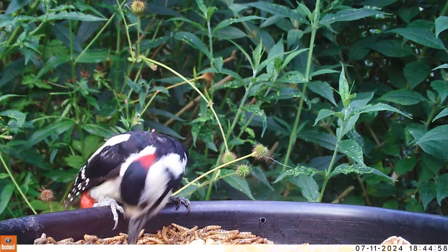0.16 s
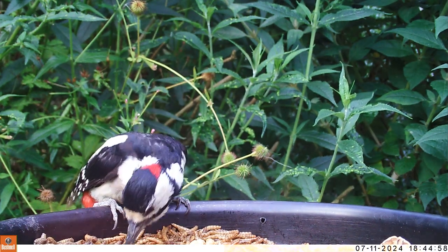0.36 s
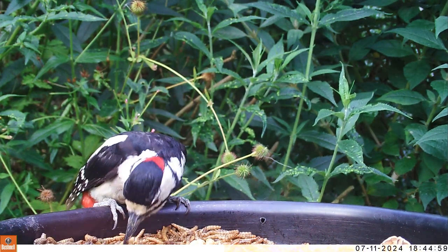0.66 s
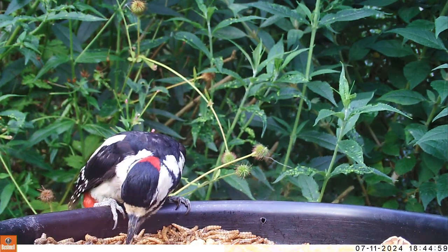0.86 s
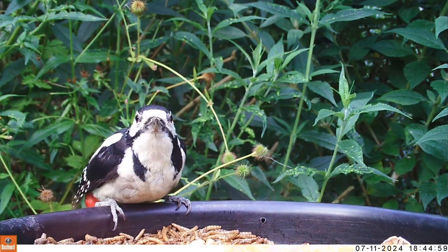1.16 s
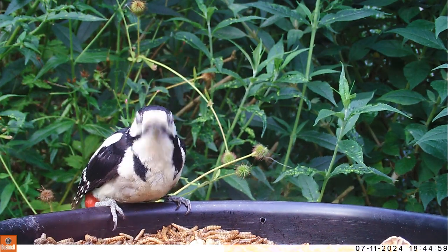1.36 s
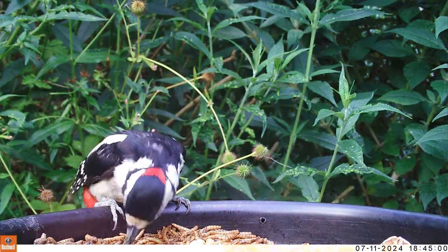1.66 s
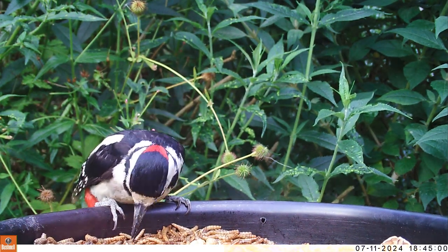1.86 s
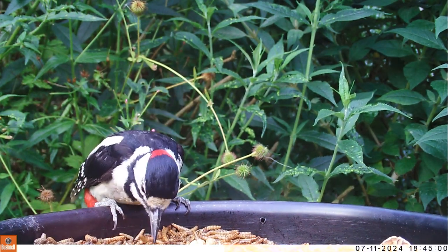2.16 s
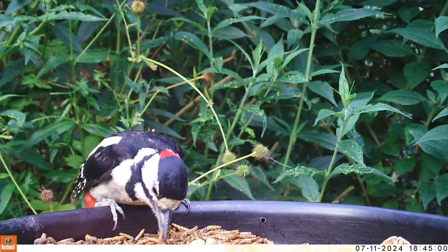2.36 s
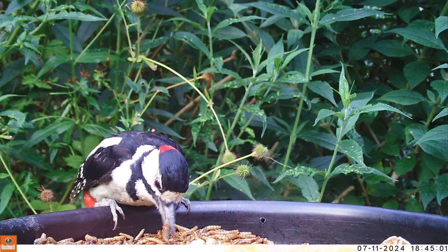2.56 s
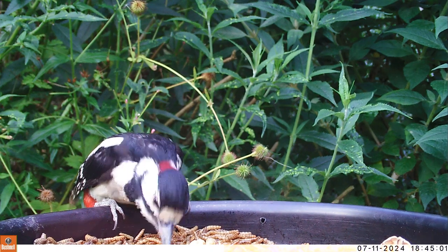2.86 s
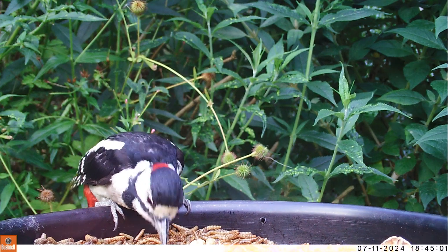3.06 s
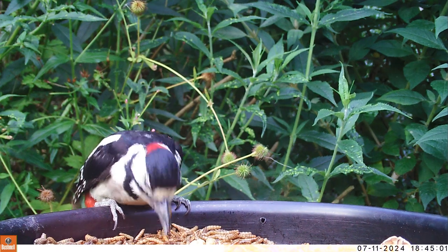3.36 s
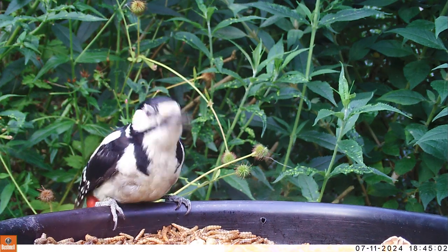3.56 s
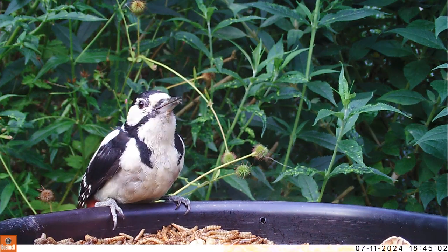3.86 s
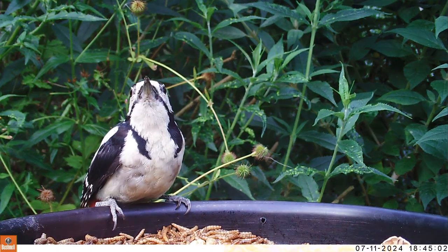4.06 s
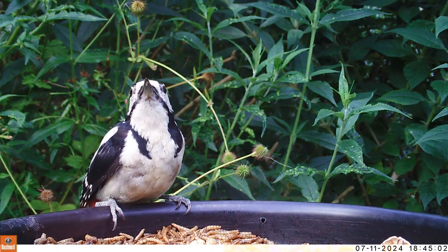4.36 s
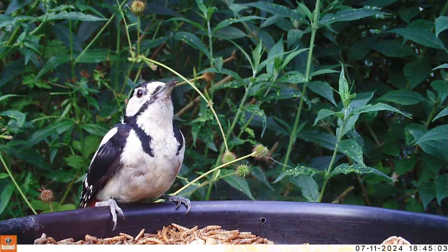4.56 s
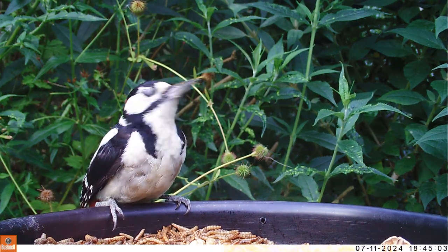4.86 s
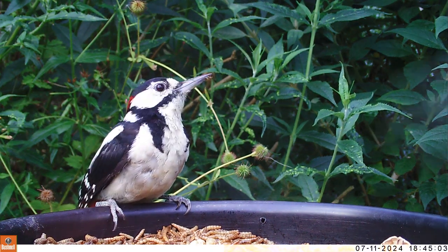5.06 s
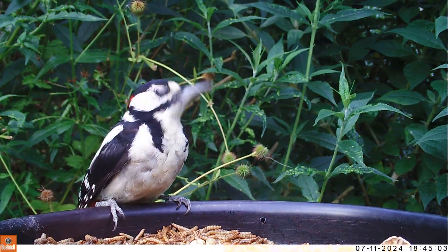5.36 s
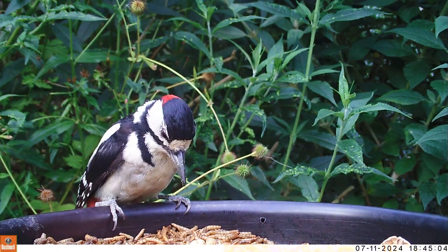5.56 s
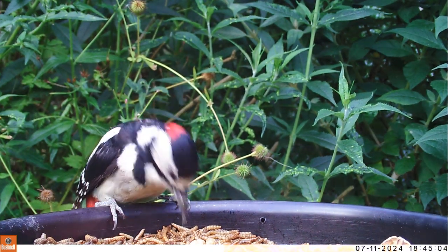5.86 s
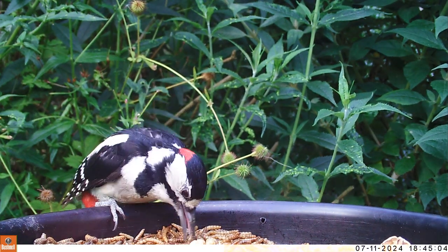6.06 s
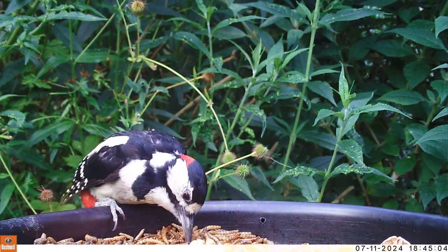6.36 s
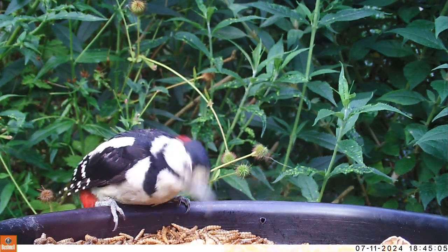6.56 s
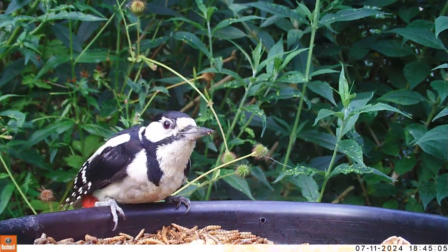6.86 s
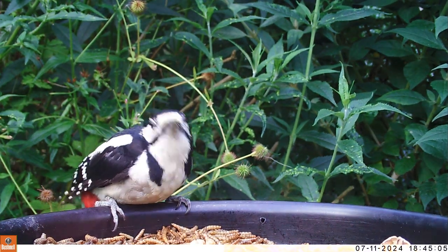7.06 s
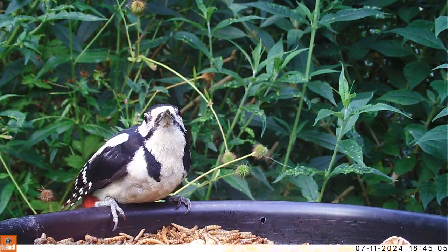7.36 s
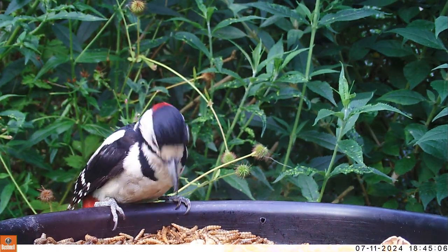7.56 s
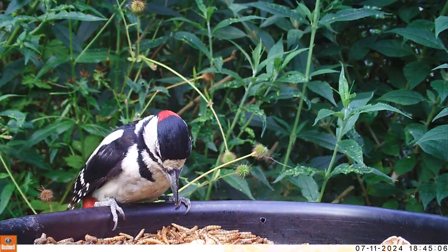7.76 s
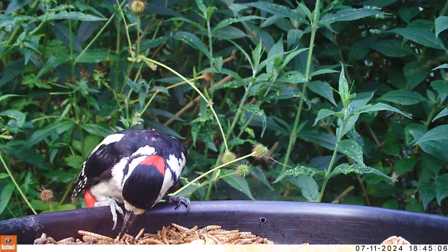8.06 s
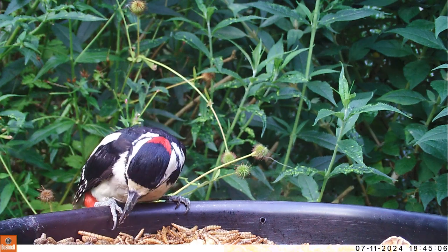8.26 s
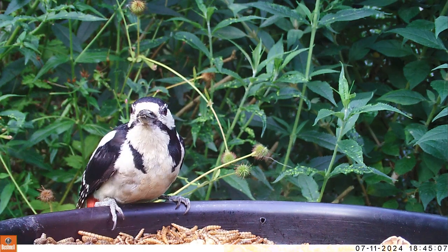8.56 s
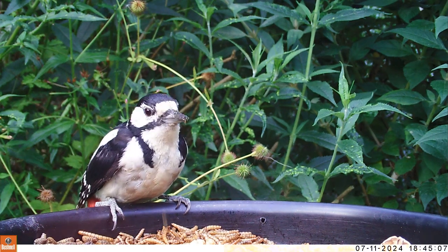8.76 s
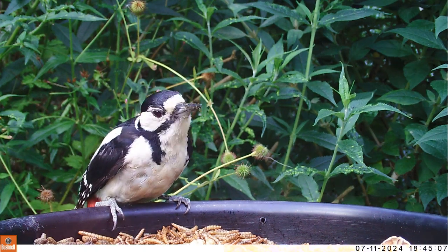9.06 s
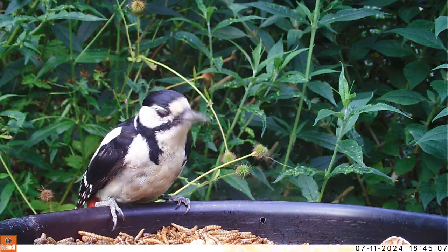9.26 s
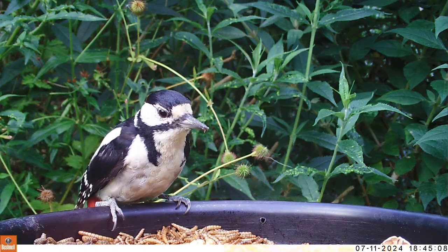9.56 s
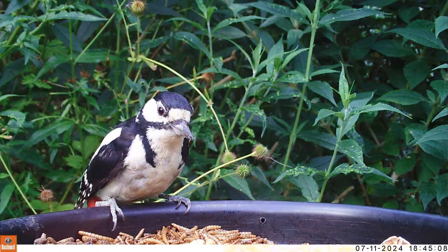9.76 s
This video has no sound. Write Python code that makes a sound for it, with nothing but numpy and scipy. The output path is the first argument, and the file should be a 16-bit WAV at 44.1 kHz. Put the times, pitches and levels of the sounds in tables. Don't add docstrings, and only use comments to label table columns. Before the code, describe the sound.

Very close to a small microphone in a garden, a woodpecker scrapes and pecks at dry food in a plastic tray. Low thumps jolt the stand, wings puff softly, then scattered taps follow. A dense burst of cracks and knocks comes midway, then sparser pecks. Towards the end a distant songbird whistles and trills, blurred by tree echoes, over steady wind rumble and hiss.

```python
import sys
import numpy as np
from scipy import signal
from scipy.io import wavfile
from scipy.ndimage import uniform_filter1d

SR = 44100
rng = np.random.default_rng(int(sys.argv[2]) if len(sys.argv) > 2 else 0)


def boost_factor(decibels):
    exponent = np.asarray(decibels, float) / 20
    return 10 ** exponent


def store_wav(level_fs):
    pcm = np.round(np.clip(np.atleast_2d(level_fs), -1, 1) * 32767)
    wavfile.write(sys.argv[1], SR, pcm.T.astype(np.int16))


N = 437031


def evened(x):
    return x / np.sqrt(np.mean(x ** 2) + 1e-20)


def add(mix, start_s, sound):
    part = mix[max(round(start_s * SR), 0):][:len(sound)]
    part += sound[:len(part)]


def ring(x, modes, soft=False):
    t = np.arange(1200) / SR
    response = 0
    for k, (hz, width, db) in enumerate(modes):
        decay = np.exp(-np.pi * width * t)
        if soft:
            decay = decay * t * np.exp(-0.55 * np.pi * width * t)
        sign = (-1) ** k
        response = response + sign * boost_factor(db) * np.sqrt(width) * decay * np.sin(2 * np.pi * hz * t)
    response = response / np.linalg.norm(response)
    response = np.reshape(response, (1,) * (x.ndim - 1) + (-1,))
    return signal.oaconvolve(x, response, axes=-1)[..., :x.shape[-1]]


# centre_s, level_db, spread_ms, tray_share_db
PECKS = [(0.2849, -57.5, 1.8, -18), (0.3203, -47, 0.86, -27), (0.3273, -63, 3.7, -17),
         (0.3567, -57, 1.3, -30), (0.389, -55, 1.8, -25), (1.763, -45, 0.85, -24),
         (2.0813, -61.5, 2.1, -19), (2.1077, -57.5, 1.4, -24), (2.7752, -68.5, 2.5, -9),
         (2.9533, -57.5, 2.9, -10), (3.2925, -63.5, 2.2, -13), (4.8425, -54, 1.5, -22),
         (5.1308, -50, 0.43, -19), (5.2995, -56, 3.6, -18), (5.311, -64, 2.5, -15), (5.3439, -49, 1.3, -13),
         (5.3548, -56, 2.9, -4), (5.3688, -52, 1.4, -13), (5.3942, -45, 1.2, -6.5),
         (5.5479, -41.5, 1.7, -21), (6.021, -59, 11, -17), (6.3845, -56, 4.7, -20),
         (6.3965, -51.5, 1.6, -16), (6.5725, -54, 0.97, -7), (6.4384, -59, 1.9, -25),
         (6.5436, -60, 0.82, -21), (8.0352, -55, 1.7, -24), (8.0407, -57, 3.4, -10),
         (8.0477, -43, 0.85, -20), (8.0542, -61, 4.5, -23), (8.7207, -65, 2.6, -25), (2.923, -70, 1, -6),
         (3.0565, -66, 1, -12), (3.067, -68, 1.2, -12), (3.077, -69, 1.5, -10), (3.1765, -71, 2, -18),
         (3.193, -72, 1, -15), (3.268, -70, 2.5, -20), (6.415, -64, 2, -22), (6.4315, -66, 1.2, -20),
         (0.487, -57, 1.7, -6), (0.545, -62, 2, -18)]
# centre_s, level_db, spread_ms, tray_share_db
KNOCKS = [(0.414, -52, 9.8, -5.5), (0.432, -62.5, 6.8, 1), (0.8211, -66, 2.3, -13), (1.7515, -57, 1.3, -12),
          (2.2235, -64, 1.4, -4), (2.208, -59, 0.83, -1), (2.25, -70, 2.2, -11), (2.5173, -65, 1.5, -5),
          (2.669, -70, 1.5, -8), (3.1099, -56, 3.8, -10), (5.2295, -59, 2.8, 6), (5.3633, -56, 2.9, -7),
          (5.3778, -62, 2, -4), (5.5449, -64, 1.9, 15), (5.562, -50, 0.83, -15), (5.8522, -65, 1.8, -3),
          (6.0483, -65, 3.3, -8), (6.0687, -58.5, 2, -6), (6.2393, -71, 1.5, -4), (6.4543, -68, 2.3, -13),
          (6.6405, -54.5, 3.7, 0), (6.6509, -64, 2.1, 9)]
# centre_s, level_db, spread_ms, tray_share_db
CRACKS = [(0.3203, -52, 0.61, -23), (0.504, -58, 1.4, 0), (0.5103, -58.5, 4.6, -6), (2.8, -70, 1.2, -13),
          (3.313, -68, 1.5, -16), (5.2185, -60, 1.8, -9), (5.2243, -45.5, 2.6, -27), (5.2456, -58, 7.4, -4),
          (5.262, -51, 3, -5), (5.2665, -45.5, 2.4, -10.5), (5.2735, -51.5, 3.7, -3),
          (5.3298, -50.5, 1.9, -11), (5.3478, -45, 2.5, -17), (5.3733, -50, 1.1, -15), (5.3955, -52, 2, -6),
          (5.4032, -49.5, 1.7, -8), (5.4795, -61.5, 2.8, -11), (5.582, -56.5, 2.7, -9),
          (5.5938, -56.5, 1.2, -5), (5.6302, -58.5, 0.77, -20), (5.8268, -65.5, 1.7, 5),
          (5.8751, -63.5, 1.4, -9), (6.6385, -48.5, 3, -8), (9.0564, -66.5, 1.5, -14),
          (9.687, -74, 2.5, -1), (9.7264, -73, 1.7, 6), (5.3675, -43.5, 1.2, -14), (5.486, -59, 1.7, -2),
          (3.1335, -70, 1, -14), (5.2405, -63, 3, -8)]
# centre_s, level_db, spread_ms, tray_share_db
SCRAPES = [(0.0738, -69.5, 4.7, -1), (0.1756, -69.5, 7, -7), (0.2145, -67.5, 18, -3), (0.2759, -73, 21, 2),
           (0.3347, -76, 18, -3), (0.3746, -68, 9, -6), (0.392, -51.5, 7.7, -7), (0.403, -44.5, 7, -18),
           (0.4575, -58.5, 5.8, -2), (0.474, -65, 3.5, -3), (0.5468, -68, 19, -19), (0.6031, -70.5, 16, -7),
           (1.764, -66, 9, -5), (2.2259, -77, 13, -5), (3.016, -74, 9, -8), (3.1284, -70, 6.9, -14),
           (5.3219, -62.5, 21, -3), (5.512, -65, 15, -7), (5.564, -56.5, 5.6, -1), (5.8342, -75, 9.8, 0),
           (5.9664, -73, 21, -6), (6.0812, -70, 6, -15), (6.4049, -70, 19, -10), (6.589, -61, 5.6, -6),
           (6.607, -63, 4.7, -10)]
# pitch_hz, width_hz, level_db
RIM = [(5800, 3100, -5.5), (7300, 920, -2), (9500, 990, -3.5), (11040, 770, 3.5), (11060, 1240, 7.5),
       (12340, 3300, -14)]


def bill():
    hits = shared(PECKS, wall_db=-3.5, wall_slope=0.39, bright_db=-10.5, bright_slope=0.022)
    hits += shared(KNOCKS, wall_db=-1, wall_slope=0.16, bright_db=-13, bright_slope=-0.23)
    hits += shared(CRACKS, wall_db=-0.5, wall_slope=0.44, bright_db=-0.35, bright_slope=0.023)
    drags = shared(SCRAPES, wall_db=-6.5, wall_slope=-0.057, bright_db=-8, bright_slope=-0.11)
    out = contacts(hits, RIM, grit_db=1.96, slip_db=3.0, snap=2.3, lead_s=0.00068)
    out += contacts(drags, RIM, grit_db=1.34, slip_db=1.5, snap=1.74, lead_s=0.00065)
    add(out, 5.547, tray_floor())
    return signal.sosfilt(signal.butter(3, 720, "high", fs=SR, output="sos"), out)


def tray_floor():
    pitch_hz, level_db, t60_s = 958, -48, 0.04
    t = np.arange(SR // 10) / SR
    return boost_factor(level_db - 60 * t / t60_s) * np.sin(2 * np.pi * pitch_hz * t)


def shared(rows, wall_db, wall_slope, bright_db, bright_slope):
    return [(s, db, tray_db, wall_db + wall_slope * tray_db, bright_db + bright_slope * tray_db, ms)
            for s, db, ms, tray_db in rows]


# pitch_hz, width_hz, level_db
TRAY = [(880, 220, 6.5), (1160, 190, 0), (1610, 370, 8), (1880, 200, 2.5), (2186, 40, -7.5)]
# pitch_hz, width_hz, level_db
WALL = [(2395, 320, -3), (2746, 280, -1), (3070, 440, 4.5), (3110, 440, -2.5)]
# pitch_hz, width_hz, level_db
PORT = [(3420, 230, -1.5), (3926, 410, 22), (4420, 1500, 5.5), (4920, 120, 1.5)]


def contacts(rows, treble, grit_db, slip_db, snap, lead_s):
    out = np.zeros(N)
    t = np.arange(-1800, 3000) / SR
    s, db, tray_db, wall_db, bright_db, ms = np.transpose(rows)[:, :, None]
    u = (t + lead_s) * 1000 / np.clip(ms, 0.4, 20)
    steepness = np.where(u < 0, snap, 1.05)
    swell = np.exp(-0.5 * abs(u * steepness) ** np.where(u < 0, 2, 1.35))
    normal, grit, slip = rng.standard_normal((3, len(rows), len(t)))
    stick_slip = evened(uniform_filter1d(slip, size=60))
    clicks = swell * normal * boost_factor(grit_db * grit ** 2 + slip_db * stick_slip)
    energy = boost_factor(db) * np.linalg.norm(swell, axis=1, keepdims=True)
    for share_db, modes in ((tray_db, TRAY), (wall_db, WALL), (0, PORT), (bright_db, treble)):
        rung = 0
        for k, mode in enumerate(modes):
            x = ring(clicks, [mode], soft=True)
            x = x / np.linalg.norm(x, axis=1, keepdims=True)
            rung = rung + (-1) ** k * boost_factor(mode[2]) * x
        rung = rung / np.linalg.norm(rung, axis=1, keepdims=True)
        for centre_s, sound in zip(s[:, 0], boost_factor(share_db) * energy * rung):
            add(out, centre_s + t[0], sound)
    return out


# peak_s, peak_db, pitch_hz, rise_ms
SPOTS = [(0.3197, -45, 3860, 0.69), (0.4015, -41, 3570, 0.73), (.4048, -51, 4200, 0.74),
         (.4052, -43, 2900, 1.1), (.4132, -49, 2810, 1.2), (.4175, -44.5, 2600, 2.2),
         (.4316, -55, 2580, 1.5), (0.473, -55, 1680, 1.6), (0.504, -51, 3920, 0.73), (.5114, -47, 3950, .9),
         (1.7631, -45, 3980, .6), (2.0805, -62, 4370, .8), (2.208, -49, 3630, .9), (2.9529, -58, 3760, .7),
         (3.1082, -52, 4000, 0.78), (5.1307, -46, 4060, 0.64), (5.2233, -47, 3940, 0.84),
         (5.2287, -47, 4140, 0.97), (5.2287, -49, 1680, 1.13), (5.268, -43, 4230, .9),
         (5.2733, -39, 3900, .9), (5.3012, -52, 3980, 1.4), (5.3298, -60, 4400, .9),
         (5.349, -43, 2670, 0.87), (5.3685, -35.5, 4070, .8), (5.373, -49, 2610, 0.6),
         (5.393, -37, 4140, 0.74), (5.4029, -43, 4060, .7), (5.402, -47.5, 3060, 0.78),
         (5.4859, -59, 4110, 1.1), (5.5005, -54, 3670, 0.56), (5.5217, -59, 3890, 1.1),
         (5.5476, -32, 4160, 1.1), (5.547, -42, 3100, 1), (5.5619, -50, 2880, 0.85),
         (5.5822, -52, 7700, 0.84), (6.0227, -56, 3800, .8), (6.0274, -58, 3830, .9),
         (6.0364, -52, 3100, 0.54), (6.3973, -37, 3650, 0.44), (6.6366, -48, 6800, 0.77),
         (6.6392, -41.5, 3520, 1.1), (6.64, -42.5, 2740, 1.2), (6.6394, -49.5, 880, 1.4),
         (6.6428, -45, 1760, 1.13), (6.6443, -47, 4180, 0.87), (6.65, -53, 2690, 1.1),
         (6.6571, -63, 4110, 1.1), (8.042, -51, 3995, .8), (8.0472, -41, 3860, 0.66)]


def spots():
    out = np.zeros(N)
    t = np.arange(1500) / SR
    for s, db, hz, ms in SPOTS:
        u = t * 1000 / ms
        add(out, s - ms / 1000, boost_factor(db) * u * np.exp(1 - u) * np.sin(2 * np.pi * hz * t))
    return out


# time_s, level_db, brightness_db
RUSTLES = [
    [(0.0, -82, -83), (0.75, -84, -85)],
    [(0.8, -87, -90), (0.95, -74, -85), (1.3, -77, -84), (1.5, -78, -82), (1.7, -91, -94)],
    [(1.9, -82, -95), (3.5, -105, -99)],
    [(4.6, -101, -99), (4.9, -67.5, -79), (5.1, -84, -88), (5.4, -73.5, -92), (5.65, -82, -91)],
    [(5.75, -90, -103), (6.7, -80, -100)],
]
# centre_s, level_db, spread_ms, tray_share_db
BEATS = [(0.888, -69, 12, -6), (0.9309, -68.5, 5.8, -3), (0.9658, -67, 14, -4), (0.9972, -77, 6.3, 2.5),
         (1.0172, -62.5, 10, -6.5), (1.0586, -68, 11, -4.5), (1.1055, -78, 22, -2), (1.1484, -60, 6.8, -10),
         (1.1873, -66, 24, -8.5), (1.2257, -57.5, 8.2, -13.5), (1.2432, -65, 6, -12),
         (1.2641, -64.5, 7.1, -8.5), (1.303, -74, 21, -5), (1.3604, -65.5, 22, -9.5),
         (1.3918, -67, 5.9, -13), (1.4078, -61.5, 5.3, -10), (1.4477, -67, 3.2, -9),
         (1.4831, -59.5, 1.5, -13), (1.5041, -73, 13, -9), (4.761, -71.5, 8, -11),
         (4.8001, -63.5, 3.9, -11), (4.825, -65, 3, -9), (4.8555, -72, 21, -10), (4.8849, -57, 3.6, -11.5),
         (4.8989, -64, 9.6, -22), (4.922, -64, 5.3, -8), (4.938, -59.5, 8, -16), (4.964, -66.5, 5.6, -2.5),
         (4.977, -58, 3.3, -20), (4.991, -68, 5.5, -6), (5.008, -66, 7.6, -7.5), (5.04, -69.5, 5, -6),
         (5.142, -63, 6.8, -7), (5.174, -70, 4.5, -7), (5.0979, -64, 3.4, -6), (5.112, -66, 14, -5)]
# pitch_hz, width_hz, level_db
PLUMAGE = [(4800, 2400, -4), (7160, 3400, -6), (10900, 5300, -2), (12200, 960, -1.5)]


def feathers():
    t = np.arange(N) / SR
    mid, high = np.zeros((2, N))
    for rows in RUSTLES:
        s, db, bright_db = np.transpose(rows)
        mid += boost_factor(np.interp(t, s, db, -120, -120))
        high += boost_factor(np.interp(t, s, bright_db, -120, -120))
    clumps = evened(uniform_filter1d(rng.standard_normal(N), size=300))
    grains = rng.standard_normal(N) * boost_factor(3.0 * clumps)
    rustle = ring(mid * grains, PORT) + ring(high * grains, PLUMAGE)
    rustle += boost_factor(-7.5) * ring(mid * grains, WALL + TRAY)
    beats = shared(BEATS, wall_db=0.5, wall_slope=1.74, bright_db=2.6, bright_slope=0.98)
    return rustle + contacts(beats, PLUMAGE, grit_db=0.2, slip_db=1.0, snap=1.86, lead_s=0.0014)


# centre_s, peak_db, pitch_hz, length_ms
JOLTS = [(0.2, -41, 37, 19), (0.24, -32.5, 30, 26), (0.338, -35, 16, 30), (0.44, -23.5, 31, 6.4),
         (0.47, -28, 54, 13), (0.473, -43.5, 100, 24), (5.36, -59, 72, 20), (0.45, -41.5, 145, 6.1),
         (0.53, -44, 39, 18), (0.5, -26.5, 17.2, 42), (0.53, -46, 74, 57), (0.611, -34, 11.4, 16),
         (0.984, -44.5, 26.9, 170), (4.976, -41, 34, 38), (5.124, -25.5, 26, 14.3), (5.116, -49, 110, 8.9),
         (5.37, -38, 23.4, 44), (5.509, -33.5, 23.6, 27)]


def stand():
    t = np.arange(-SR // 2, SR // 2) / SR
    out = np.zeros(N + SR)
    for s, db, hz, ms in JOLTS:
        swell = np.exp(-0.5 * (t * 1000 / ms) ** 2)
        add(out, s, -boost_factor(db) * swell * np.cos(2 * np.pi * hz * t))
    return out[SR // 2:][:N]


NEAR_S = 6.5


def songbird():
    out, direct = np.zeros((2, N))
    waver = evened(uniform_filter1d(rng.standard_normal(N + SR), size=400))
    for s, length, first_hz, last_hz, glide, db in notes():
        t = np.arange(round(length * SR)) / SR
        if first_hz < last_hz:
            bend = 0.8
        elif first_hz > 1.3 * last_hz:
            bend = 2.1
        else:
            bend = 1.4
        hz = last_hz + (first_hz - last_hz) * np.clip(1 - t / glide, 0, 1) ** bend
        hz *= 1 + 0.0045 * waver[round(s * SR):][:len(t)]
        flutter_db = 2.5 * waver[::-1][round(s * SR):][:len(t)]
        swell_db = -3.5 * np.clip(1 - t / (0.62 * length), 0, 1)
        note = np.sqrt(2) * np.sin(2 * np.pi * np.cumsum(hz) / SR)
        note *= boost_factor(db + flutter_db + swell_db) * signal.windows.tukey(len(t), 0.25)
        add(out, s, note)
        if s < NEAR_S:
            direct_db = -2.5
        elif glide < length:
            direct_db = -5.5
        else:
            direct_db = -14
        add(direct, s, note * boost_factor(direct_db))
    near = np.arange(N) < NEAR_S * SR
    heard = direct + boost_factor(np.where(near, -14, 0.5)) * tree_echoes(out)
    return heard + boost_factor(-3.0) * ring(heard, [(4330, 3700, 0)])


# start_s, length_s, first_hz, last_hz, level_db
SWEEPS = [(0.524, 0.023, 7250, 7420, -66), (0.54, 0.065, 2430, 1960, -80), (0.61, 0.045, 1950, 2050, -83),
          (0.7, 0.15, 1740, 1664, -90), (3.496, 0.042, 7500, 6900, -66.5), (7.112, .08, 5950, 5800, -85),
          (7.966, 0.029, 5000, 4400, -67.5), (8.013, 0.075, 4800, 4530, -73),
          (8.346, 0.045, 3620, 4490, -65), (8.388, 0.03, 4400, 5150, -78),
          (8.418, 0.057, 4190, 4090, -73.5), (8.438, 0.035, 6670, 7120, -69),
          (8.472, 0.13, 7100, 6630, -73), (8.887, 0.026, 5680, 3850, -62.5),
          (9.175, 0.025, 7570, 7320, -71), (9.195, 0.024, 7400, 6550, -68.5),
          (9.476, 0.083, 8500, 7550, -75), (9.603, 0.08, 5960, 5610, -68), (9.748, 0.052, 7020, 3980, -63),
          (9.879, 0.021, 6780, 4060, -56.5)]
# start_s, length_s, first_hz, held_hz, level_db
WHISTLES = [(0.047, 0.16, 2640, 2574, -88), (0.871, 0.135, 2850, 2915, -79.5),
            (1.054, .07, 2180, 2400, -84), (1.418, 0.16, 7550, 7660, -79), (4.58, .1, 7600, 7750, -90),
            (7.06, 0.1, 7550, 7550, -88), (7.261, 0.051, 5590, 5580, -76), (7.58, .06, 7600, 7600, -91),
            (7.991, 0.065, 4520, 4316, -70.5), (8.18, 0.093, 4300, 4096, -61),
            (8.65, 0.114, 4760, 4520, -62), (8.797, 0.088, 5790, 5560, -65.5),
            (9.269, 0.12, 3410, 3645, -68)]


def notes():
    trill = [(7.357 + k * 0.1515, 0.022, 5600, 4050, -71 + k * 0.7) for k in range(4)]
    gliding = [(s, length, first, last, length, db) for s, length, first, last, db in SWEEPS + trill]
    slide_s = 0.0397
    held = [(s, length, first, last, slide_s, db) for s, length, first, last, db in WHISTLES]
    return gliding + held


# delay_s, depth_s, level_db
TREES = [
    (0.045, 0.012, 1.5),
    (0.095, 0.0078, -0.5),
    (0.19, 0.02, -0.5),
]


def tree_echoes(song):
    t = np.arange(SR) / SR
    clump_db = sum(db * np.exp(-((t - s) / depth) ** 2) for s, depth, db in TREES)
    fade = boost_factor(-60 * t / 0.8 + clump_db) * (1 - np.exp(-t / 0.0074))
    leaves = rng.random((3, SR)) < 2500 / SR
    echoes = rng.choice([-1., 1.], (3, SR)) * leaves * fade
    cycles = 4.0 * np.arange(N) / SR + np.arange(3)[:, None] / 3
    sway = np.cos(2 * np.pi * cycles) * np.sqrt(2 / 3)
    echoes = echoes / np.linalg.norm(echoes[0])
    return signal.fftconvolve(song * sway, echoes, axes=1)[:, :N].sum(axis=0)


# pitch_hz, level_db (per Hz)
AIR = [(20, 1), (60, -7.5), (120, -12.5), (300, -23.5), (700, -33), (2000, -43), (3200, -46.5), (4000, -42),
       (4800, -49), (7000, -51), (10000, -52.5), (12500, -52.5), (13900, -53.5), (14300, -44)]
# time_s, extra_db
WIND = [(0.0, 2.5), (9.91, 1.5)]


def air():
    frames = N // 512 + 5
    hz = np.fft.rfftfreq(2048, 1 / SR)[:, None]
    a, b = rng.standard_normal((2, len(hz), frames))
    f, db = np.transpose(AIR)
    colour = np.interp(np.log(hz + 1), np.log(f), db, right=-110)
    gusts = np.interp(np.arange(frames) * 512 / SR, *np.transpose(WIND)) / (1 + (hz / 70) ** 2)
    spectra = (a + 1j * b) * boost_factor(colour)
    steady = signal.istft(spectra, nperseg=2048, noverlap=1536)[1]
    gusty = signal.istft(spectra * boost_factor(gusts) * (hz > 12), nperseg=2048, noverlap=1536)[1]
    return boost_factor(-52.5) * gusty[:N] / np.std(steady)


def scene():
    return (bill() + spots() + feathers() + stand() + songbird() + air())[None]


def band_limit(x):
    return signal.sosfilt(signal.butter(12, 14430, fs=SR, output="sos"), x)


def record(dry):
    low_pass = signal.firwin(401, 14130, window=("kaiser", 6), fs=SR)
    limited = signal.oaconvolve(dry, low_pass[None], "same")
    return band_limit(limited)


dry = scene()
out = record(dry)
store_wav(out)
```